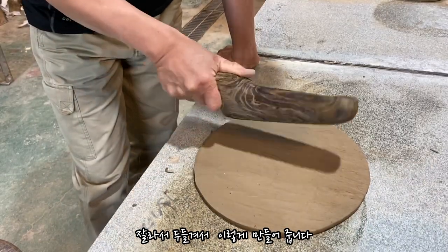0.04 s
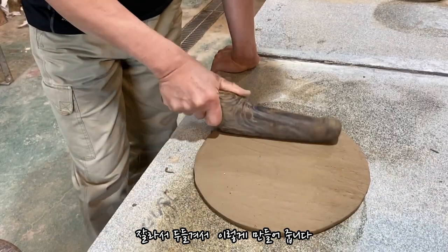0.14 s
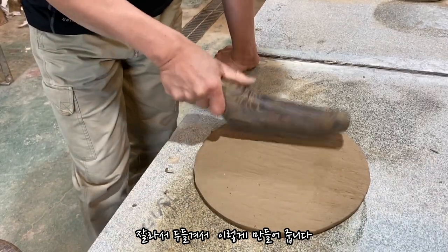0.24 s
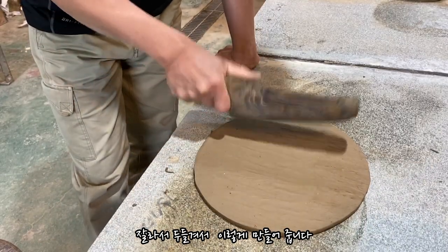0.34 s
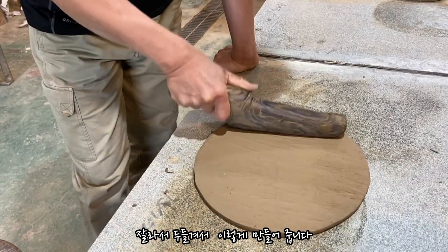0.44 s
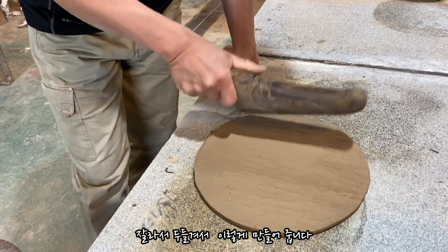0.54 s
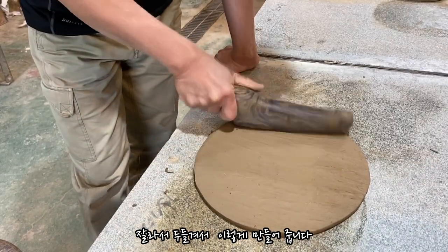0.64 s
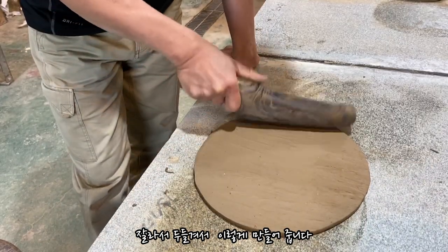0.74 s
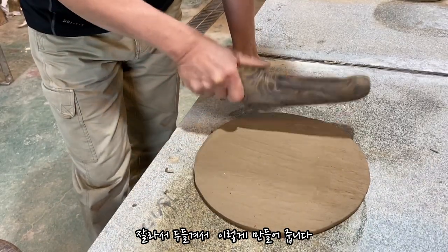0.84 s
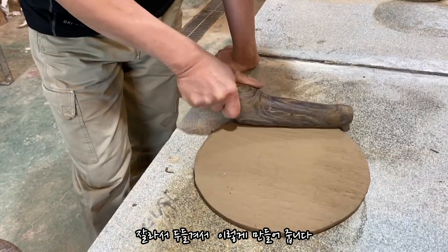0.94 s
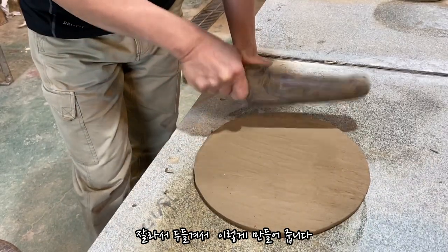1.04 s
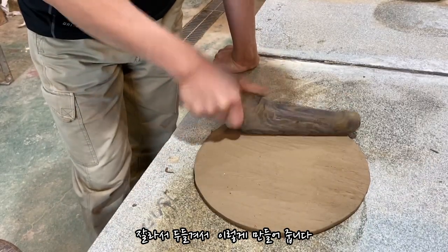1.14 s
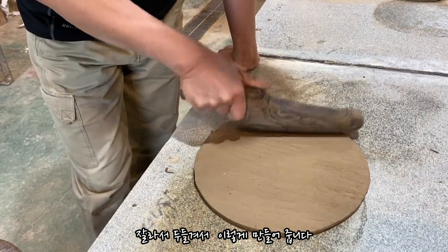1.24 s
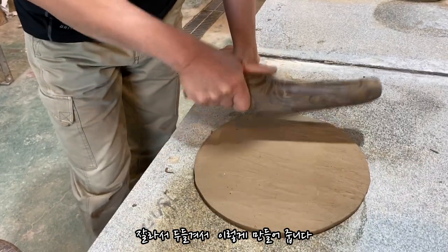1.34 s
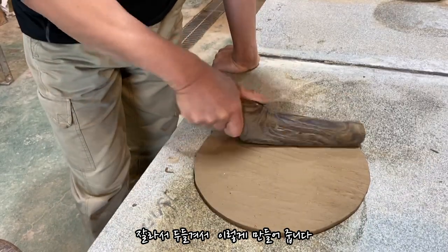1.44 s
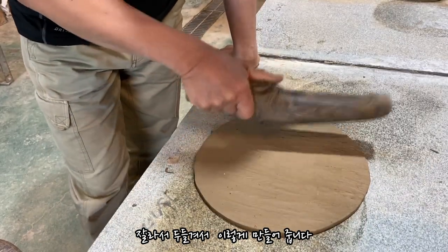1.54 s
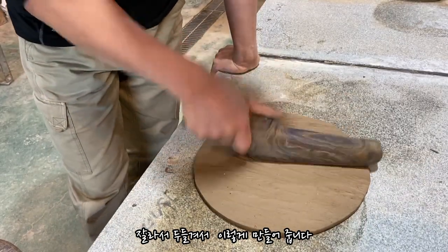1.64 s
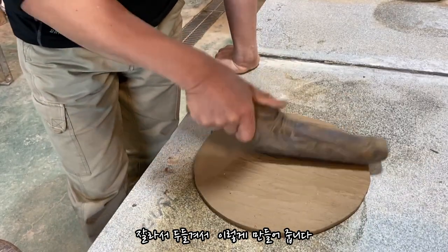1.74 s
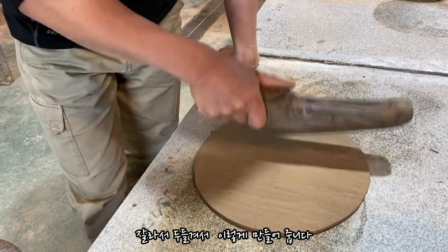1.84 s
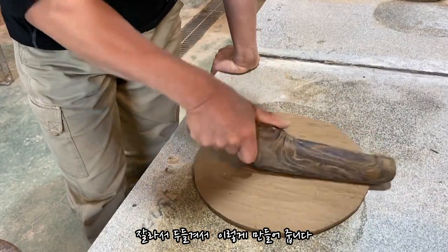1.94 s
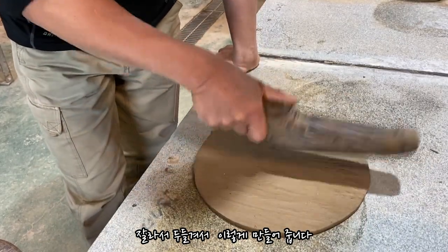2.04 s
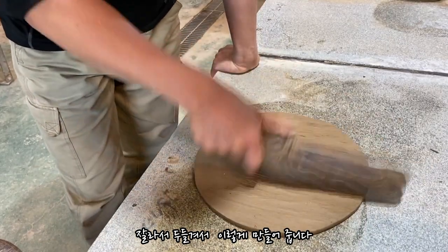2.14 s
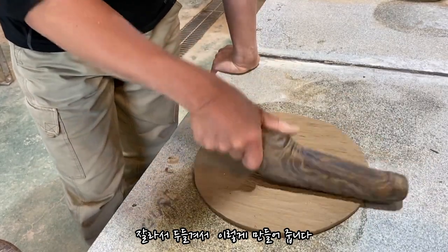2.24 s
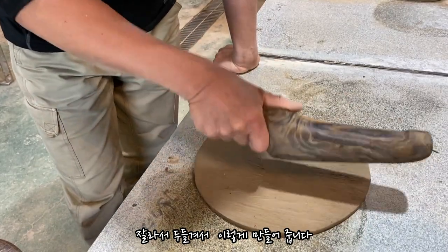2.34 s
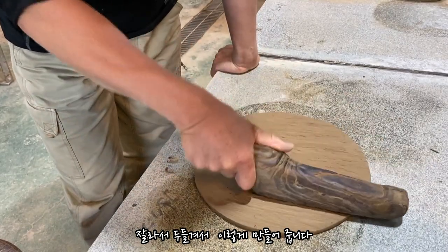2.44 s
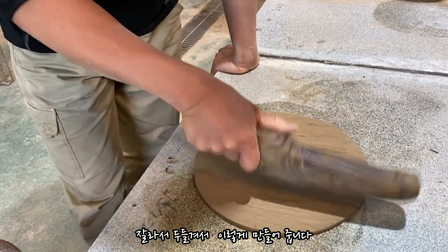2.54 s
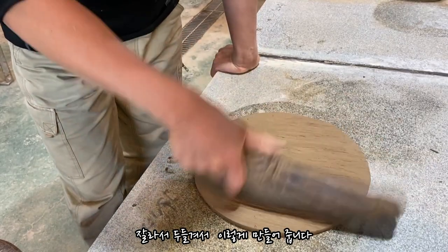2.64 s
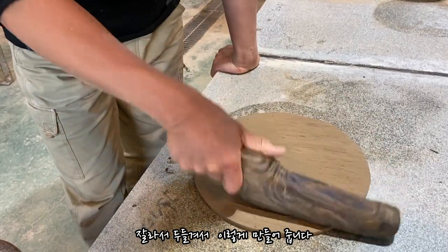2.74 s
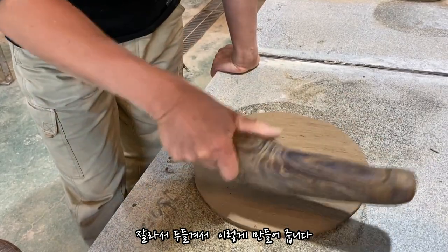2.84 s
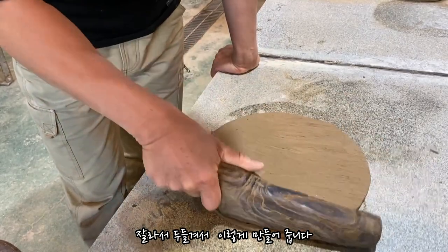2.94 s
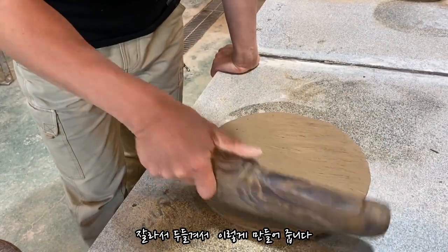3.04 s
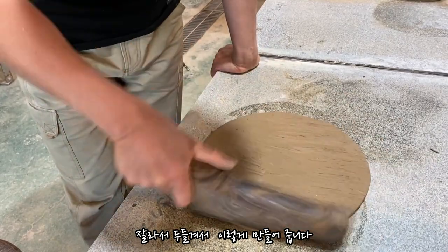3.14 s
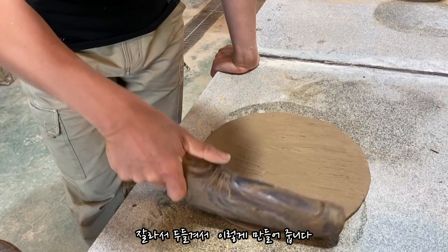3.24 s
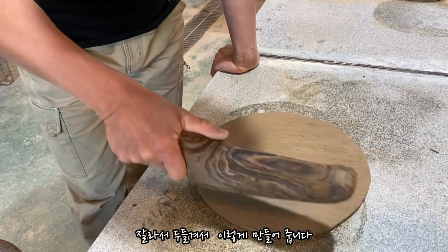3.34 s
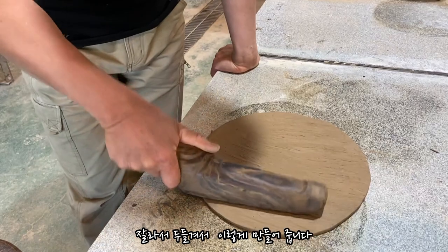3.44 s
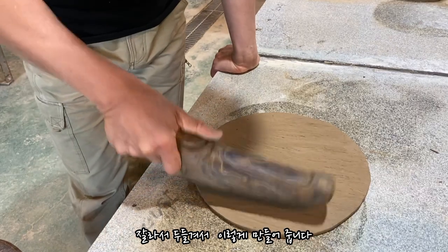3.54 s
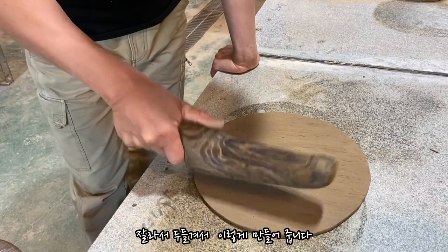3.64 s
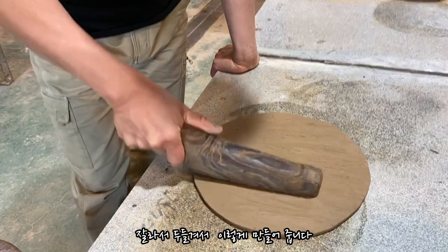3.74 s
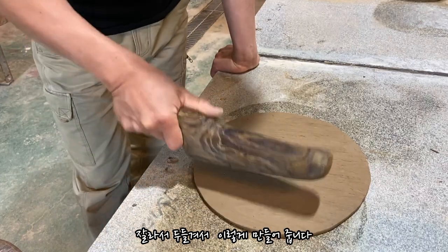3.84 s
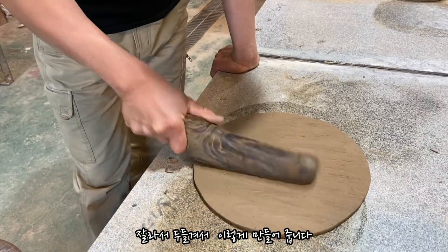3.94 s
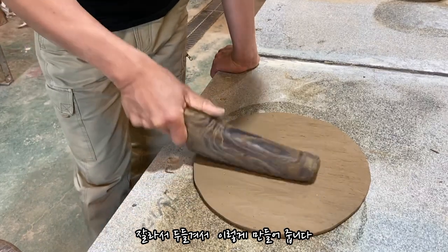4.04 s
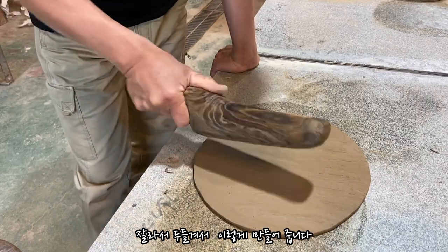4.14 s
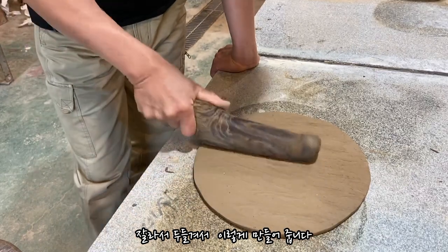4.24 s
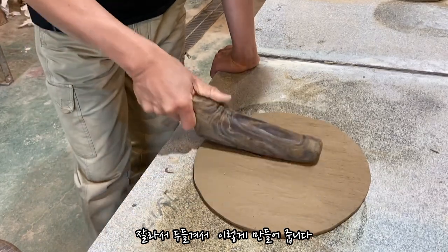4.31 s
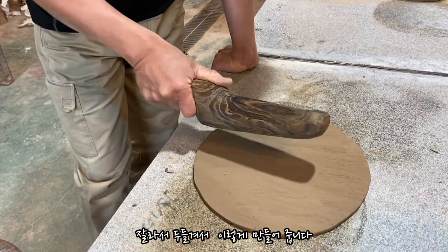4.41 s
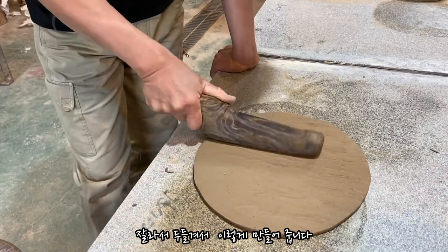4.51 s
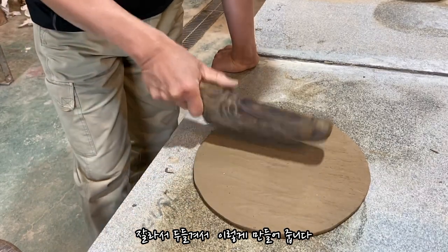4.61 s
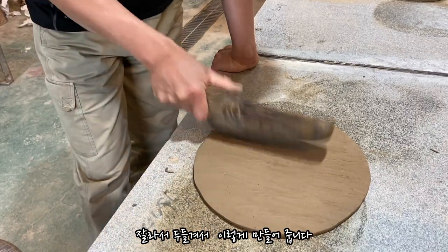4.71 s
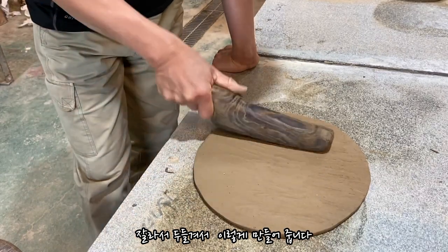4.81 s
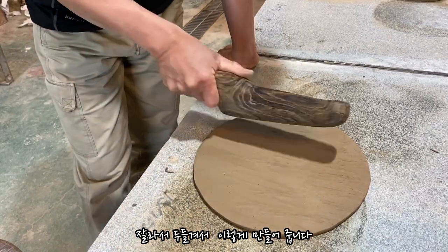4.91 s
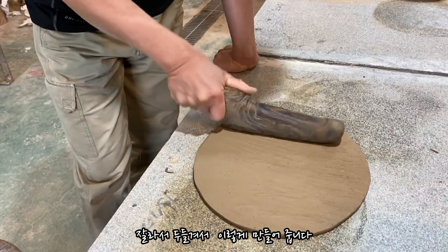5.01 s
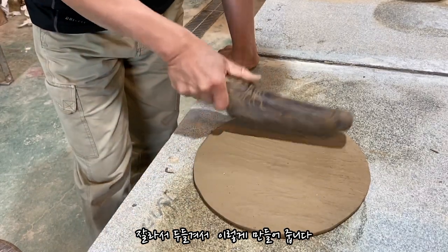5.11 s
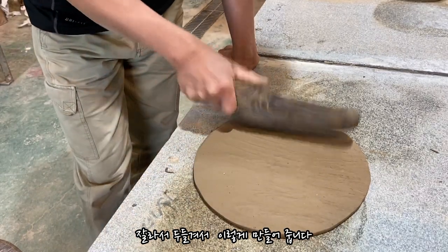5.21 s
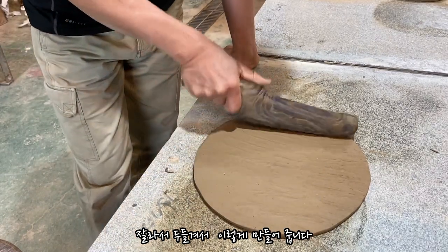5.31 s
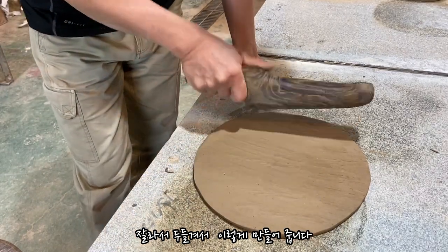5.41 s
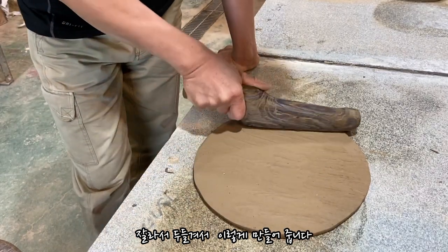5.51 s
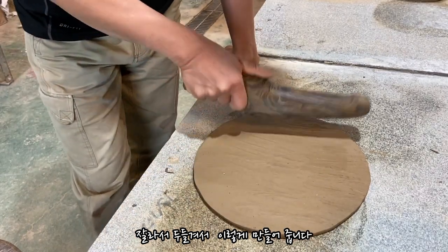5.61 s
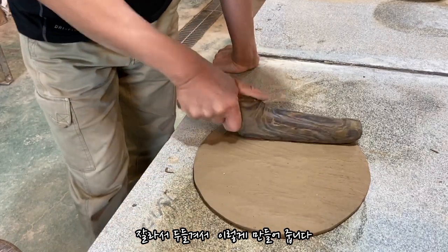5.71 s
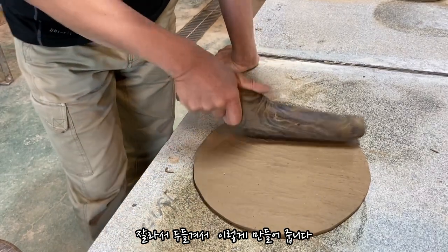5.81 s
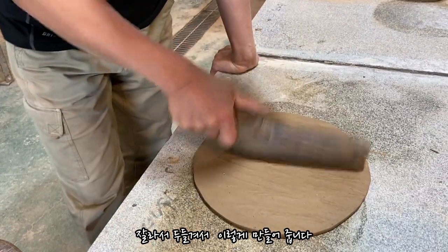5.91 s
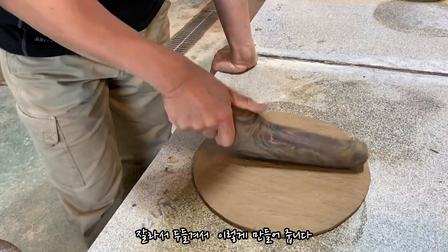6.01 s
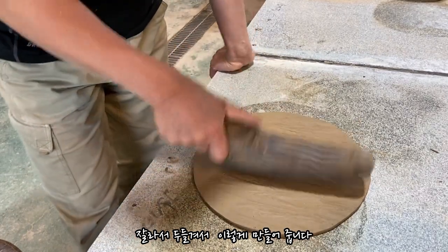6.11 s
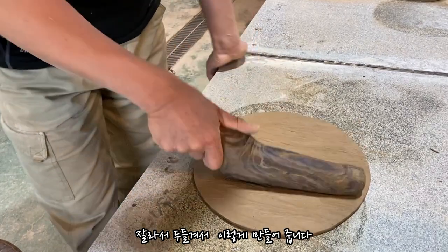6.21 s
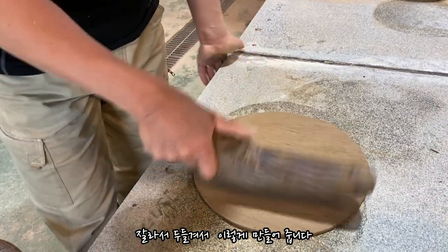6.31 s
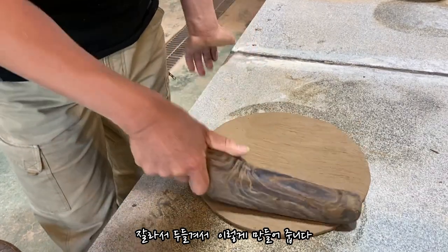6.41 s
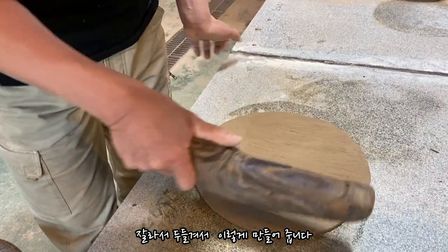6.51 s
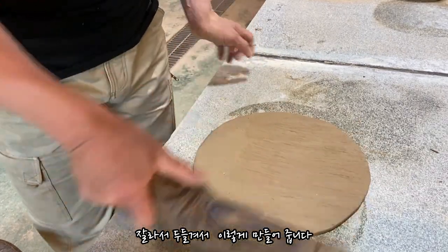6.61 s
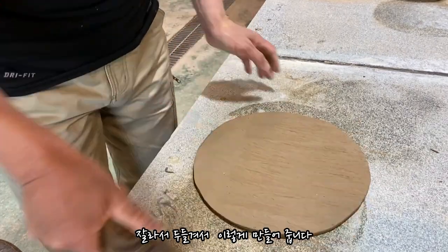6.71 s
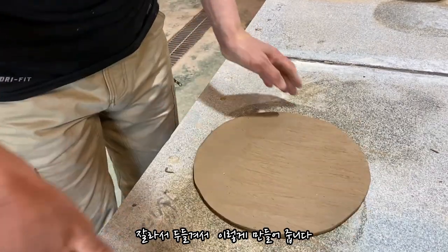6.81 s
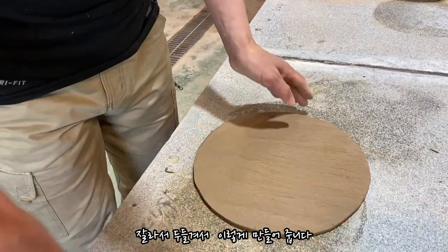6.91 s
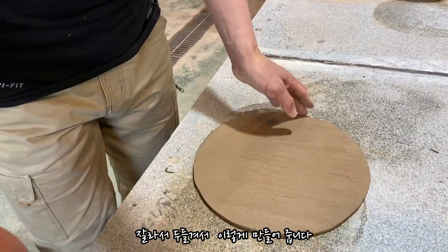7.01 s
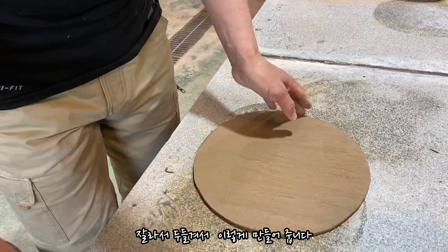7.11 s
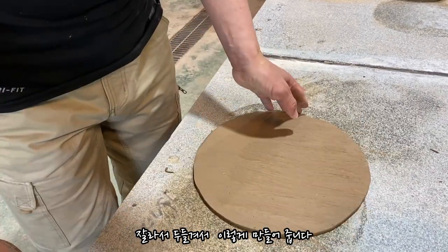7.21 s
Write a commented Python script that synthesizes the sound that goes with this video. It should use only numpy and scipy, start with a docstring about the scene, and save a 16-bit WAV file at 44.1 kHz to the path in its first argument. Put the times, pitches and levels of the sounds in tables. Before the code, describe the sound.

A wooden paddle slaps wet clay on a stone table in rapid, steady beats, ending with a few soft bumps.

```python
"""A pottery workshop: a wooden paddle beats a clay slab flat on a stone table, four blows a second.
Each blow is a wet slap of clay and trapped air plus a hollow knock with a pitch of its own.
The table rings, low standing waves boom, and the walls echo over still air.
After the last blow come rustles and soft bumps as the paddle is put away, with a brief low drone."""
import sys
import numpy as np
from scipy import signal
from scipy.fft import rfft, irfft
from scipy.io import wavfile
from scipy.ndimage import uniform_filter1d

SR = 44100
rng = np.random.default_rng(int(sys.argv[2]) if len(sys.argv) > 2 else 0)


def file_out(sig):
    """Save sig as 16-bit WAV at sys.argv[1]."""
    # one column per channel
    cols = np.atleast_2d(sig).T
    # limit, then scale
    lim = np.clip(cols, -1, 1)
    pcm = np.round(lim * 32767).astype(np.int16)
    wavfile.write(sys.argv[1], SR, pcm)


N = 319901
FRAME, ROOM_FRAME = 2048, 256  # samples
BIN_HZ = np.fft.rfftfreq(FRAME, 1 / SR)


def amp(db):
    return 10 ** (np.asarray(db) / 20)


def unit_rms(x):
    return x / np.sqrt(np.mean(x ** 2) + 1e-20)


def curve(points, hz=BIN_HZ):
    """Interpolates over log frequency."""
    point_hz, value = np.transpose(points)
    return np.interp(np.log(hz + 1), np.log(point_hz + 1), value)


def add(mix, time_s, sound):
    """Mixes a sound in, trimmed to fit."""
    at = round(time_s * SR)
    sound = sound[..., max(-at, 0):]
    part = mix[..., max(at, 0):][..., :sound.shape[-1]]
    part += sound[..., :part.shape[-1]]


def pulse(spectrum_db):
    """Minimum-phase pulse with this spectrum."""
    cepstrum = irfft(np.log(amp(np.maximum(spectrum_db, -100))))
    half = len(cepstrum) // 2
    cepstrum[1:half] *= 2
    cepstrum[half + 1:] = 0
    return irfft(np.exp(rfft(cepstrum)))


def convolve(a, b):
    return signal.fftconvolve(np.atleast_2d(a), np.atleast_2d(b), axes=1)


def resonance_db(centre_hz, width_hz, lift_db):
    """One resonant peak on a flat spectrum."""
    detune = 2 * (BIN_HZ - centre_hz) / width_hz
    return 10 * np.log10(1 + (amp(lift_db) ** 2 - 1) / (1 + detune ** 2))


def contact(squirt_s=0.0012, hit_s=0.00021, spread_s=0.0022, solid_hz=1200, lag_hz=680):
    """Air squirts out, wood meets clay, the heel lands: a flat burst centred in its frame."""
    t = (np.arange(FRAME) - FRAME // 2) / SR
    squirt = amp(-14) * np.exp(-abs(t) / squirt_s)
    hit = np.exp(-(t / (2 * hit_s)) ** 2) + amp(-6) * np.exp(-abs(t) / spread_s)
    heel_s = 0.0025 * rng.uniform(0.37, 1.0)
    heel = amp(-7) * np.exp(-abs(t - heel_s) / hit_s)
    envelope = np.where(t < 0, squirt, hit + heel)
    grains = rfft(envelope * (rng.standard_normal(FRAME) + 0.4 * rng.standard_normal((2, FRAME))))
    grains /= np.sqrt(uniform_filter1d(abs(grains) ** 2, size=40, axis=1))
    # long waves see one push, late as the clay yields; short waves see many small contacts
    lag_s = 0.00375 * (1 + 0.19 * rng.uniform(-0.71, 0.65, (2, 1)))
    push = rfft(t == 0) * np.exp(-2j * np.pi * lag_s * lag_hz * np.arctan(BIN_HZ / lag_hz))
    solid = 1 / (1 + (BIN_HZ / solid_hz) ** 8)
    return irfft(np.sqrt(solid) * push + np.sqrt(1 - solid) * grains)


# thud shape: (frequency [Hz], share of thud_db [ratio])
THUD = [(90, 1), (200, 0.84), (400, 0.4), (800, 0.031)]


def clay_db(force_db, sharp_db, pocket_hz, pocket_db, thud_db):
    """Colour of one blow: force, thud, sharpness of the slap and the clap of an air pocket."""
    yield_hz, yield_share = 400, 0.42  # clay yields: the bass follows only part of the force
    sharp_hz, pocket_octaves = 2560, 0.54
    force = force_db * (BIN_HZ ** 2 + yield_share * yield_hz ** 2) / (BIN_HZ ** 2 + yield_hz ** 2)
    slap = sharp_db * BIN_HZ ** 2 / (BIN_HZ ** 2 + sharp_hz ** 2)
    pocket = pocket_db / (1 + (np.log2((BIN_HZ + 1) / pocket_hz) / pocket_octaves) ** 2)
    return force + thud_db * curve(THUD) + slap + pocket


def paddle_knock_db(modes, q=8.8):
    """Paddle modes, damped by the clay within a few cycles."""
    return sum(resonance_db(hz, hz / q, db) for hz, db in np.reshape(modes, (-1, 2)))


# modes of the table and things on it: (frequency [Hz], level [dB], t60 [s])
TABLE_MODES = [(239.3, -41, 0.67), (261, -37.5, 0.46), (269, -37.5, 0.44), (286, -31, 0.38),
               (304, -33, 0.36), (363.3, -29, 0.17), (376.5, -26, 0.13), (560, -38, 0.26),
               (587, -40.5, 0.29), (612, -36, 0.18), (691, -32.5, 0.27), (736, -35, 0.21),
               (750, -37.5, 0.48), (778, -36.5, 0.38), (773.6, -24, 0.14), (893, -34, 0.11),
               (956, -42, 0.31), (982, -39.5, 0.34), (1075, -41.5, 0.32), (1083, -38, 0.21),
               (1327, -51, 0.77), (1430, -46, 0.61), (1483, -44.5, 0.43)]
# mode families favoured by the paddle's place: (time [s], gain 1 [dB], gain 2 [dB], gain 3 [dB])
FAMILY_GAINS = [(.08, 2.5, -1, -2), (1.1, -0.5, -2.5, -2), (1.359, -3.5, -3.5, -2), (1.859, -6, -3, -1.5),
                (2.12, -7.5, 2.5, 1.5), (2.37, -5.5, 0.5, 1), (2.86, -3, 8, 0.5), (3.11, -1.5, 4, 0),
                (3.38, -3.5, -0.5, 3.5), (3.64, -2, -4.5, 6.5), (4.18, -2, -3.5, 9.5), (4.44, 1, 2.5, 6),
                (4.7, 1, 3, 2.5), (5.19, 1, 0.5, -2.5), (5.67, -3, -3, -2), (5.89, 0, -3.5, 0.5),
                (6.31, -6.5, -7.5, 3)]
FAMILY_CENTRES_HZ, FAMILY_WIDTH_HZ = [(705, 985), (750, 1074), (565,)], 38


def table_ring(time_s, t):
    """Each blow lands on a new spot and wakes the modes differently, with a phase for each ear."""
    times_s, *families_db = np.transpose(FAMILY_GAINS)
    out = np.zeros((2, len(t)))
    for hz, db, t60 in TABLE_MODES:
        for centres_hz, gains_db in zip(FAMILY_CENTRES_HZ, families_db):
            nearness = sum(np.exp(-((hz - centre) / FAMILY_WIDTH_HZ) ** 2) for centre in centres_hz)
            db += nearness * np.interp(time_s, times_s, gains_db)
        phase = 2 * np.pi * rng.random() + 0.65 * rng.standard_normal((2, 1))
        envelope = amp(db + 2.5 * rng.standard_normal() - 60 * t / t60)
        out += envelope * np.cos(2 * np.pi * hz * t + phase)
    return out


def shimmer(t, centre_hz=2151, width_hz=150, t60_s=1.7):
    """Things in the workshop ring on faintly in a narrow band."""
    edges_hz = [centre_hz - width_hz / 2, centre_hz + width_hz / 2]
    band = signal.butter(2, edges_hz, "band", fs=SR, output="sos")
    noise = unit_rms(signal.sosfilt(band, rng.standard_normal((2, len(t)))))
    return amp(-56.5 - 60 * t / t60_s) * noise


# standing waves of table and workshop: (frequency [Hz], level [dB], t60 [s])
STANDING_WAVES = [(61.2, -31.5, 0.41), (73.3, -26, 0.28), (81.96, -25, 0.37), (91.04, -23, 0.39),
                  (110.13, -20.5, 0.46), (127.76, -30, 0.66), (142.5, -36, 0.41), (160.4, -41.5, 0.76)]


def boom(arrive_s=0.0109, swell_s=0.042):
    """The table is pushed down; standing waves build together, then beat as they die."""
    t = np.arange(SR) / SR
    waves = -sum(amp(db - 60 * t / t60) * np.cos(2 * np.pi * hz * (t - arrive_s))
                 for hz, db, t60 in STANDING_WAVES)
    return waves * np.sin(np.pi / 2 * np.minimum(t / swell_s, 1)) ** 2


# near walls: (delay [s], level [dB])
WALL_ECHOES = [(.0046, -14.5), (0.0096, -16), (0.0129, -11.5), (0.017, -17.5), (0.03, -18.5)]


def wall_echoes(gain_db=-4, jitter_s=0.00055, cutoff_hz=6000):
    """Near walls return the blow dulled, at delays that shift from blow to blow."""
    taps = np.zeros((2, FRAME))
    for delay_s, db in WALL_ECHOES:
        for ear in taps:
            add(ear, delay_s + jitter_s * rng.uniform(-1, 1), amp([db + gain_db]))
    return signal.lfilter(*signal.butter(1, cutoff_hz, fs=SR), taps)


def scatter(previous=0, kept=0, steady_hz=1200, mono_hz=260):
    """Dense reflections as short-time spectra; lows can persist, and the bass is alike at both ears."""
    hz, _, fresh = signal.stft(rng.standard_normal((2, SR)), SR, nperseg=ROOM_FRAME)
    common = 1 / (1 + (hz[:, None] / mono_hz) ** 2)
    fresh[1] = common * fresh[0] + np.sqrt(1 - common ** 2) * fresh[1]
    share = kept / (1 + (hz[:, None] / steady_hz) ** 2)
    return share * previous + np.sqrt(1 - share ** 2) * fresh


# reverb colour: (frequency [Hz], gain [dB])
ROOM_COLOUR = [(40, -13.5), (110, 7), (200, 4), (300, -3), (450, -8), (620, 2.5), (1000, -4), (1500, -3),
               (2400, -3), (4000, -4.5), (7000, 0), (11000, -7), (15000, -15.5)]
# reverb decay: (frequency [Hz], t60 [s])
ROOM_DECAY = [(60, 1), (250, 0.88), (700, 0.64), (1500, 0.67), (2150, 0.47), (2700, 0.59), (4500, 0.59),
              (9000, 0.41), (13000, 0.31), (15000, 0.22)]


def reverb(reflections, early_t60_s=0.28, late_t60_s=1.4, late_above_hz=1100, build_s=0.004):
    """Room response: a quick wash, a longer tail and faintly lingering highs."""
    t, hz = np.arange(SR) / SR, np.fft.rfftfreq(ROOM_FRAME, 1 / SR)[:, None]
    age_s = np.arange(reflections.shape[-1]) * ROOM_FRAME / 2 / SR
    early = amp(6 - 60 * age_s / early_t60_s)
    main = amp(-60 * age_s / curve(ROOM_DECAY, hz))
    late = amp(-16 - 60 * age_s / late_t60_s) * hz / np.hypot(hz, late_above_hz)
    decay = np.sqrt(early ** 2 + main ** 2 + late ** 2)
    decay /= np.sqrt((decay ** 2).sum(1, keepdims=True) * ROOM_FRAME / 2)
    tail = signal.istft(reflections * decay, SR, nperseg=ROOM_FRAME)[1][:, :SR]
    tail *= 1 - np.exp(-(t / build_s) ** 2)
    return convolve(tail, pulse(curve(ROOM_COLOUR)))[:, :SR]


def radiate(burst, spectrum_db, grain_db=-6, ripple_db=2.2, ripple_above_hz=1200):
    """The blow as the room gathers it from all directions: a smoother burst with uneven treble bands."""
    power = 1 - amp(grain_db) + amp(grain_db) * abs(rfft(burst[0])) ** 2
    smooth_burst = np.fft.fftshift(irfft(np.sqrt(power)))
    ripple = unit_rms(uniform_filter1d(rng.standard_normal(len(BIN_HZ)), 17))
    treble = BIN_HZ / np.hypot(BIN_HZ, ripple_above_hz)
    return convolve(smooth_burst, pulse(spectrum_db + ripple_db * ripple * treble))


# mean slap spectrum: (frequency [Hz], level [dB])
SLAP_SPECTRUM = [(30, 1), (100, 14.5), (190, 14), (300, 23.5), (440, 22.5), (540, 18.5), (750, 17),
                 (1000, 18), (1250, 14.5), (2000, 13), (2600, 12), (4000, 12.5), (5400, 7.5), (10800, 8),
                 (13000, 8), (16000, -6)]
# steady paddle resonances, direct sound only: (frequency [Hz], width [Hz], lift [dB])
WOOD_MODES = [(792, 11, 9), (1510, 82, 5.5), (7100, 900, 5.5), (10600, 1600, 7.5)]
# landing spot: (time [s], position [0 far rim, 1 near rim])
LANDING = [(0, 0.055), (1.35, 0.35), (3.1, 0.66), (5.3, 0.043), (6.3, 1)]
# blows: (time [s], boom [dB], force [dB], sharpness [dB], pocket [Hz], pocket lift [dB], thud [dB],
# then frequency [Hz], lift [dB] for each of four paddle modes that shift with grip and contact point)
PADDLE_BLOWS = [(-0.185, -0.5, 9.0, -12.5, 3370, 2.6, -5.5, 700, 6.8, 1290, 3.0, 2590, 2.5, 7540, 8.9),
                (0.076, -3, 7, -7.5, 3940, 3.3, -4.5, 690, 12.7, 1610, 1.3, 3000, 2, 3800, 3.5),
                (0.3349, 2, 9.5, -11.5, 3400, 6.9, -6.5, 714, 15, 1280, 5.1, 2590, 2.5, 7700, 7.9),
                (0.6015, 1.5, 5.0, -8.5, 940, 7.4, -2, 665, 8, 1570, 9.6, 2030, 2.9, 3810, 7.9),
                (0.854, 2, 4.5, -7, 4930, 3.2, 0.5, 820, 5.5, 950, 4.2, 2250, 4.1, 6400, 4.7),
                (1.1045, 0.5, -4.5, 3, 865, 11.4, 5, 656, 4.4, 1530, 11.7, 2240, 2.8, 3420, 10.3),
                (1.354, 0.5, 5.5, -11, 4460, 4.3, -5.5, 705, 1.1, 1140, 7.1, 1760, 14, 6370, 2.7),
                (1.606, -2, 3.5, -11.5, 4730, 8.6, 1.5, 700, 8.4, 1044, 15, 1570, 3.9, 9800, 8.9),
                (1.859, -2.5, -4.5, 3.5, 545, 7.1, 8, 800, 3.6, 1110, 6, 2180, 7.5, 5700, 5.7),
                (2.1142, 0, 3, -7, 3500, 9.2, 6.5, 640, 2.2, 1060, 10, 2090, 7.3, 5170, 7.2),
                (2.37, -0.5, 0.5, 0.5, 1220, 1.7, 11.5, 487, 4.4, 1030, 13, 2140, 5.2, 9300, 6.5),
                (2.6172, 1.5, 0, -3, 1130, 5.9, 11.5, 820, 5.5, 940, 6.3, 2830, 11, 4100, 6.5),
                (2.8634, -1, -1.5, -2.5, 3460, 8.9, 11, 824, 4.5, 990, 12, 2580, 12.2, 4140, 5.4),
                (3.1138, 1, -0.5, -8, 839, 8.9, 9.5, 726, 2.1, 1400, 6.5, 2110, 14, 4000, 9.4),
                (3.376, -1.5, -4, 5.5, 1200, 3.8, 10, 730, 4.6, 1400, 6.5, 1560, 3.5, 6460, 4.5),
                (3.6434, 4.0, 0.5, -0.5, 806, 2.7, 12.0, 520, 7.8, 1190, 13.3, 2040, 10.4, 3120, 2.3),
                (3.9102, 1.5, -2, -1, 4140, 9.4, 8.5, 700, 18, 1300, 8.7, 2080, 4.6, 8790, 6),
                (4.1783, 4, 4.5, -2.5, 3510, 1.4, 4.0, 580, 5.5, 1260, 7.1, 1950, 6.7, 12300, 2.6),
                (4.4397, 1.5, 6, -11.5, 4950, 9.0, 2, 590, 10, 870, 16, 1530, 6.3, 2980, 5.8),
                (4.695, 4.5, 6.5, -11, 2230, 4.9, 5.5, 594, 10.8, 880, 7.1, 2170, 2.0, 11500, 11.2),
                (4.947, 0.5, -3.5, 1.5, 5000, 6, 2.5, 689, 10, 1600, 6.3, 1890, 6.5, 3340, 9.8),
                (5.195, 3.5, 3, -7.5, 4970, 8.5, 1, 877, 13.3, 1450, 5.1, 2120, 5.7, 7750, 3.4),
                (5.4355, 0.5, -5, 3, 3520, 7.7, 5.5, 705, 5.8, 890, 11.3, 3000, 1.5, 4230, 9.2),
                (5.6703, 2.5, 3, -11.5, 4200, 9.1, 2.5, 484, 5.3, 1770, 9.7, 2210, 9.6, 11500, 12.3),
                (5.89, -3.0, 3, -11.5, 6450, 2.7, 3.5, 612, 6.8, 1086, 11.2, 1920, 9.6, 6600, 3.3),
                (6.1042, -5.5, -4, -3, 2160, 1.3, 4.5, 884, 5.5, 1720, 5.5, 2940, 6.7, 5400, 7.3),
                (6.314, -4.5, -5.5, -4.5, 3580, 1, 5, 630, 15.7, 1600, 7.7, 2030, 12, 5960, 5.8)]


def paddle(knock_room_share=0.42, ring_attack_s=0.0012):
    """Each blow passes its colour to table and room; soft blows and near ones sound drier."""
    out, t = np.zeros((2, N)), np.arange(SR) / SR
    low_boom, reflections = boom(), scatter()
    wood_db = sum(resonance_db(*mode) for mode in WOOD_MODES)
    for time_s, boom_db, force_db, sharp_db, pocket_hz, pocket_db, thud_db, *modes in PADDLE_BLOWS:
        colour_db = clay_db(force_db, sharp_db, pocket_hz, pocket_db, thud_db)
        slap_db = curve(SLAP_SPECTRUM) + colour_db
        knock_db = paddle_knock_db(modes)
        burst, paths = contact(), wall_echoes()
        nearness = np.interp(time_s, *np.transpose(LANDING))
        paths[:, 0] += amp(-4 + 2 * nearness - 0.14 * force_db)  # direct path
        start_s = time_s - FRAME / 2 / SR
        add(out, start_s, convolve(convolve(burst, paths), pulse(slap_db + wood_db + knock_db)))

        radiated = radiate(burst, slap_db + knock_room_share * knock_db)
        reflections = scatter(reflections, kept=0.99)  # the highs change as the paddle moves on
        add(out, start_s, convolve(reverb(reflections), radiated))

        ringing = (table_ring(time_s, t) + shimmer(t)) * (1 - np.exp(-t / ring_attack_s))
        add(out, time_s, convolve(ringing, pulse(colour_db)))
        add(out, time_s, amp(boom_db) * low_boom)
    return out


# still air: (frequency [Hz], level [dB])
AIR_SPECTRUM = [(25, -1.5), (65, -7.5), (130, -13.5), (300, -28), (800, -41.5), (2000, -40.5), (5000, -46),
                (16000, -42)]


def still_air(gain_db=-61.5, spread=0.54):
    """Steady low noise, mostly common to both ears."""
    gain = amp(curve(AIR_SPECTRUM, np.fft.rfftfreq(N, 1 / SR)))
    common, *ears = [unit_rms(irfft(rfft(rng.standard_normal(N)) * gain, N)) for _ in range(3)]
    return amp(gain_db) * (common + spread * np.array(ears))


# cloth and hand: (time [s], level [dB], centre [Hz], length [s])
BRUSHES = [(6.834, -67, 1200, 0.014), (6.891, -61, 1148, 0.017), (6.898, -70.5, 4400, .15),
           (6.925, -76.5, 1700, 0.13), (7.016, -55, 12100, 0.0049), (7.045, -61, 12000, 0.034),
           (7.161, -75, 850, 0.13)]


def rustles():
    """Cloth and hand brush briefly: bursts of band noise."""
    out = np.zeros((2, N))
    for time_s, db, hz, length_s in BRUSHES:
        band = signal.butter(2, [hz / 1.35, hz * 1.4], "band", fs=SR, output="sos")
        brush = signal.sosfilt(band, rng.standard_normal((2, int(length_s * SR))))
        add(out, time_s, amp(db) * unit_rms(brush) * signal.windows.tukey(brush.shape[1], 0.5))
    return out


# paddle put away: (time [s], level [dB], cutoff [Hz])
SOFT_BUMPS = [(6.895, -19.5, 556), (6.906, -11.5, 394), (6.955, -26.5, 200), (7.088, -17.5, 326),
              (7.139, -31.5, 183), (7.243, -38, 750)]


def bumps(direct_db=19, room_db=16, boom_db=-2, highpass_hz=140, settle_s=0.0056):
    """Dull contacts settle within milliseconds and stir the room."""
    out, t = np.zeros((2, N)), np.arange(FRAME) / SR
    for time_s, db, cutoff_hz in SOFT_BUMPS:
        band = (BIN_HZ + 1) / (BIN_HZ + highpass_hz) / np.hypot(1, (BIN_HZ / cutoff_hz) ** 4)
        push = pulse(db + 20 * np.log10(band))
        scuff = rng.standard_normal(FRAME) * np.exp(-t / settle_s)
        response = amp(room_db) * reverb(scatter()) + amp(boom_db) * boom()
        response[:, :FRAME] += amp(direct_db) * scuff / np.linalg.norm(scuff)
        add(out, time_s, convolve(push, response))
    return out


# drone envelope: (time [s], level [dB])
DRONE_LEVEL = [(6.9, -84), (6.96, -54), (7.03, -47.5), (7.1, -65), (7.17, -52), (7.25, -56)]


def drone(pitch_hz=113, waver=0.028):
    """A low, wavering tone swells under the bumps."""
    drift = unit_rms(uniform_filter1d(rng.standard_normal(N), size=2000))
    cycles = np.cumsum(pitch_hz * (1 + waver * drift)) / SR
    level_db = np.interp(np.arange(N) / SR, *np.transpose(DRONE_LEVEL), left=-120)
    return amp(level_db) * np.sin(2 * np.pi * cycles)


def scene():
    return paddle() + bumps() + rustles() + still_air() + drone()


# stereo balance: (frequency [Hz], right over left [dB])
BALANCE = [(30, 1.5), (80, 2.5), (160, 3.5), (330, 0.9), (700, 0.1), (1400, 0), (2600, -1.5), (5500, -3),
           (11000, 1)]


def record(dry, left_lead_s=0.00001, ceiling=0.95, cutoff_hz=16600):
    """Two ports differ in colour, the left slightly nearer; then soft clipping and a band limit."""
    sides = np.array([[-1], [1]])
    ports = amp(sides * curve(BALANCE) / 2) * np.exp(-1j * np.pi * sides * BIN_HZ * left_lead_s)
    port_taps = np.fft.fftshift(irfft(ports), axes=1)
    heard = convolve(dry, port_taps)[:, FRAME // 2:][:, :N]
    clipped = heard / (1 + (heard / ceiling) ** 6) ** (1 / 6)
    lowpass = signal.firwin(255, cutoff_hz, window=("kaiser", 9), fs=SR)
    return signal.oaconvolve(clipped, lowpass[None], "same")


dry = scene()
out = record(dry)
file_out(out)
```